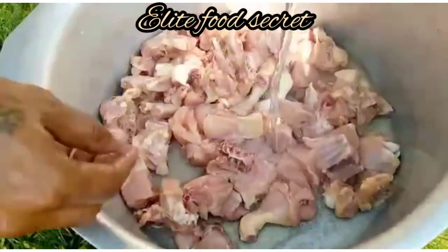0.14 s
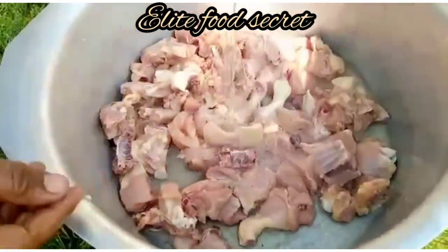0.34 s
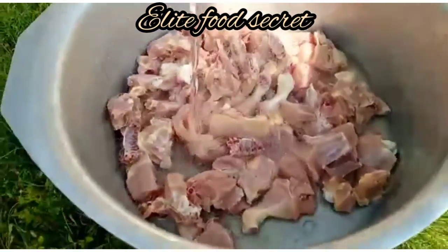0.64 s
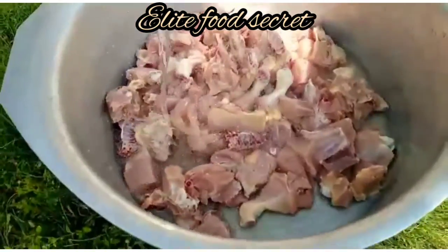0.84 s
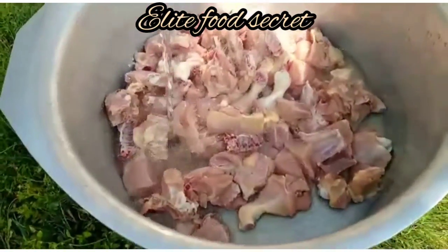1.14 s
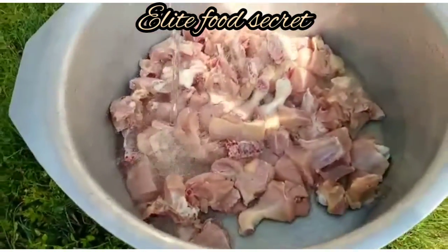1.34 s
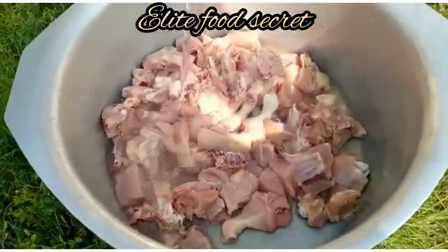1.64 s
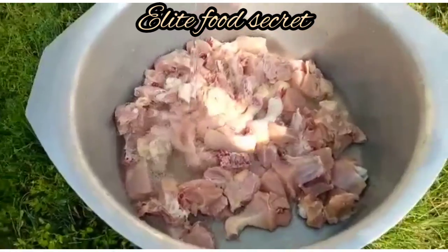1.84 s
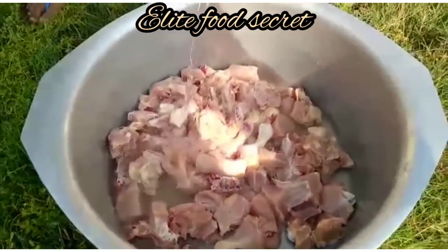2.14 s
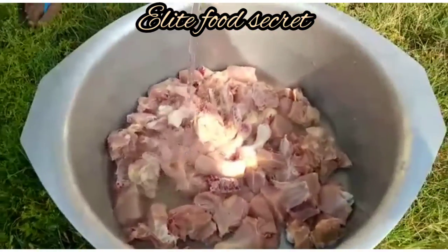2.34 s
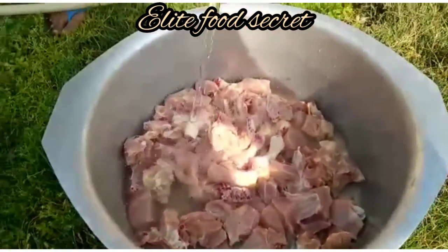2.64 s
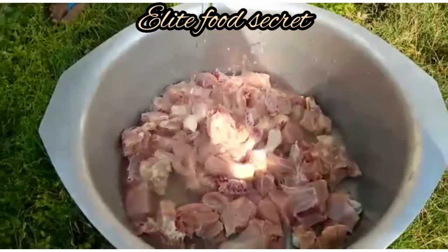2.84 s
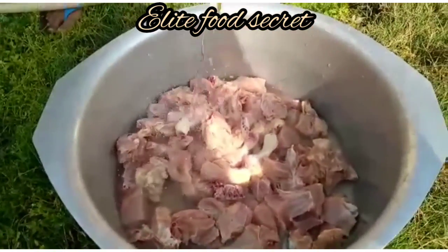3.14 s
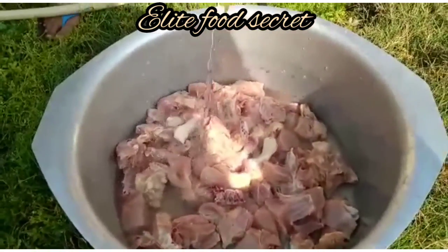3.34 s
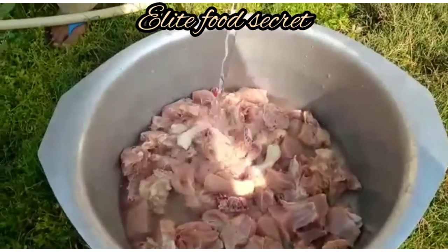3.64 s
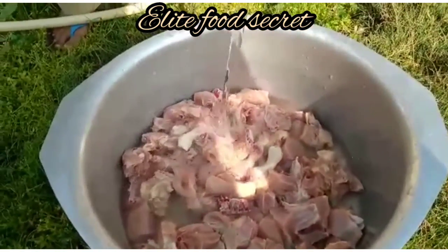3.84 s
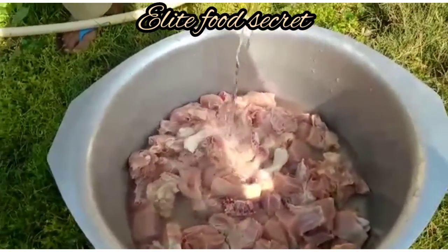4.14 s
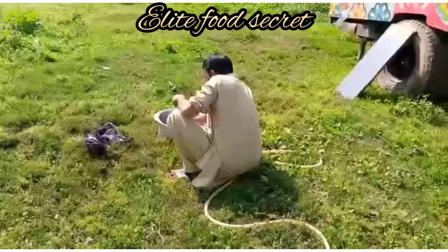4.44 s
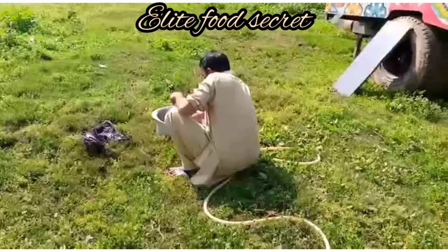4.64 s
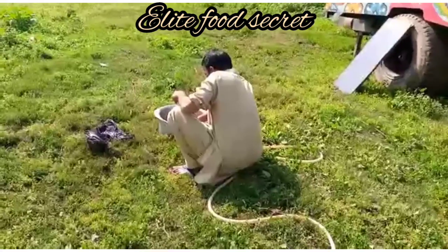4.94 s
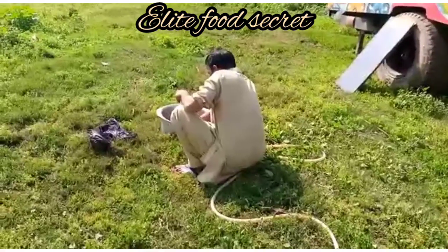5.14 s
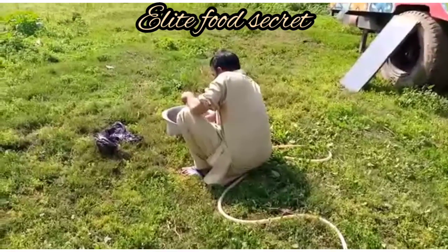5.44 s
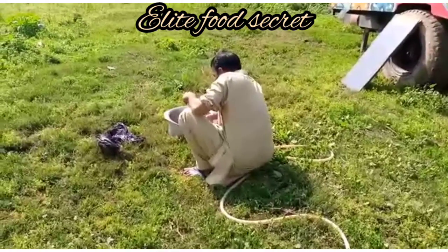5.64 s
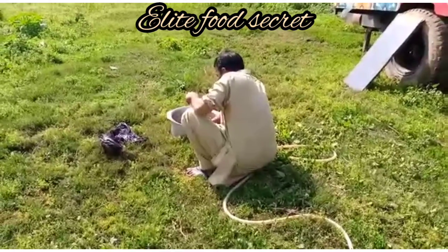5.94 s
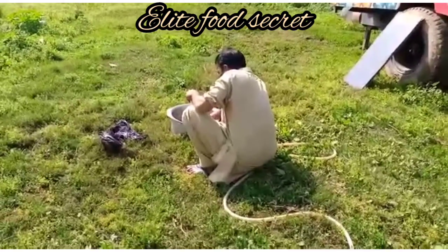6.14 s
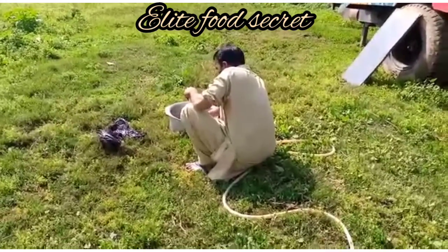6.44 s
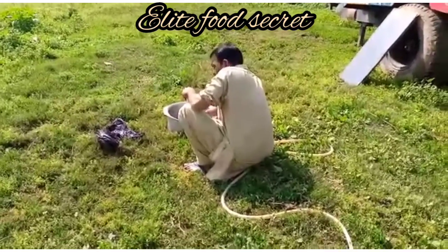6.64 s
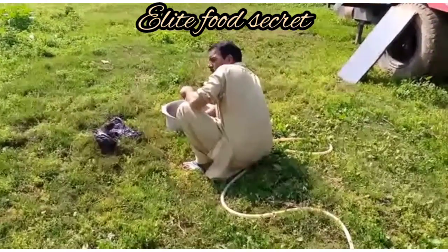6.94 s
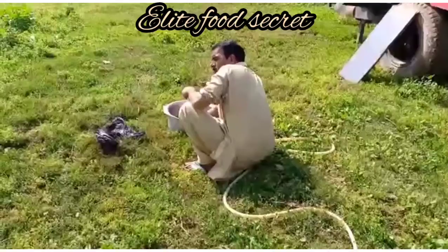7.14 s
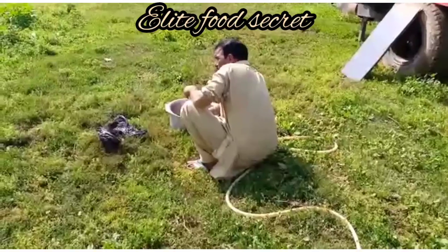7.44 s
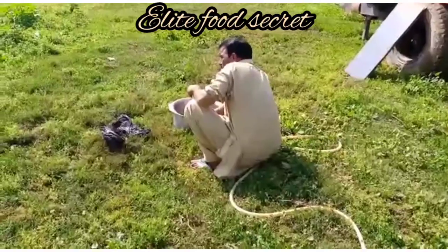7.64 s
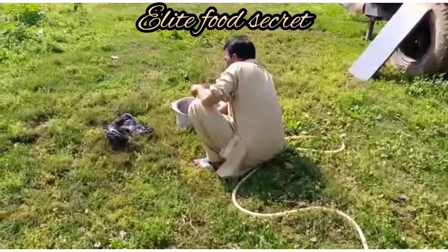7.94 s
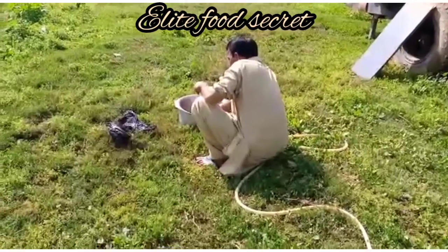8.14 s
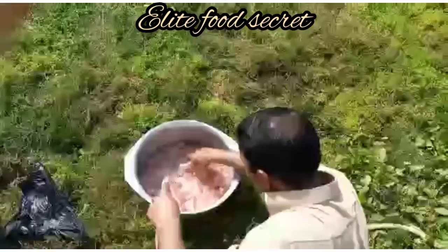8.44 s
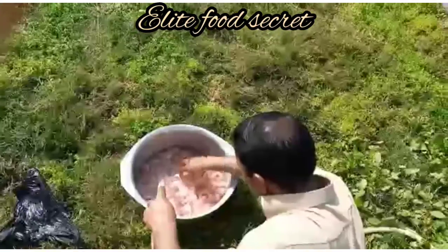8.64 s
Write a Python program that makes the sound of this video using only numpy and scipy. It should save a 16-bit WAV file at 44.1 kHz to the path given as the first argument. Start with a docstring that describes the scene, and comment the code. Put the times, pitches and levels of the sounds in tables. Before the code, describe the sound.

From 0 to 4.2 s, close up outdoors, a hose stream hits raw chicken in a wide metal pot: bright crackling spray and mid-pitched patter in uneven surges. The bare metal floor rings for the first half second, with bubbly glugs; sharp fat drops smack throughout. Gurgles recur, notably around 1.2 s and 3.8 s, and from about 3 s the splash shifts towards pooled water. A dull low rumble and soft bumps lie beneath. At 4.2 s the pour cuts off to far quieter distant washing: irregular sloshes, small wet smacks, drips and faint glugs, with a wavering low engine drone strongest around 4.5-6.8 s. Rising-then-falling bird whistles come near 4.6, 5.9 and 7.9 s, thin twitters around 5-5.6 and 7.3-7.8 s, and a faint grasshopper hiss swells intermittently. After a tiny silence at 8.3 s, closer squelchy, fizzing rubs follow in quick succession, with two nearer chirps at 8.5 and 8.7 s.

```python
"""Outdoors, a hose runs onto raw chicken in a wide metal pot: modal ringing of the bare floor comes first, with
filtered bubble showers for the spray on the meat and the gurgling pool, over an engine's harmonics and a rumble.
Then hands wash the pieces some way off, heard as coloured bubble showers rising with each stroke, while a
grasshopper rasps in swelling noise and birds whistle in gliding sines. After a brief silence come rubs close by,
and a nearer bird chirps."""
import sys
import numpy as np
from scipy import signal
from scipy.fft import rfft, irfft, next_fast_len
from scipy.io import wavfile
from scipy.ndimage import map_coordinates

SR = 44100
rng = np.random.default_rng(int(sys.argv[2]) if len(sys.argv) > 2 else 0)


def unload_audio(sound):
    """Save the sound as a 16-bit wav file, at the path given as the first command line argument."""
    columns = np.transpose(np.atleast_2d(sound))
    # keep every value between -1 and 1, then stretch to whole-number steps
    steps = np.round(np.clip(columns, -1, 1) * 32767)
    wavfile.write(sys.argv[1], SR, steps.astype(np.int16))


N = 388080
T = np.arange(N) / SR
POUR_END, FAR_END, NEAR_START = 4.228, 8.307, 8.356  # s


def amp(db):
    """Decibel law: a level in dB becomes an amplitude ratio."""
    return 10 ** (np.asarray(db) / 20)


def unit(x):
    """Power normalisation: scale to an rms of 1."""
    return x / np.sqrt(np.mean(x ** 2) + 1e-20)


def curves(rows, t=T):
    """Linear interpolation: one curve over time for each column after the time."""
    s, *columns = np.transpose(rows)
    return [np.interp(t, s, column) for column in columns]


def wobble(rate):
    """Slow random modulation: a smooth curve through `rate` random knots a second."""
    knots = rng.standard_normal(int(N * rate / SR) + 4)
    return map_coordinates(knots, [T * rate], order=2)


def add(track, s, sound):
    """Superposition: mix a sound in at time s."""
    part = track[max(round(s * SR), 0):][:len(sound)]
    part += sound[:len(part)]


def swells(rows, attack, release):
    """Envelopes added in power: each row rises, holds and decays; one gain curve per dB column."""
    power = np.zeros((len(rows[0]) - 2, N))
    for s, length, *db in rows:
        first, last = max(int(s * SR), 0), int((s + length + 8 * release) * SR)
        age = T[first:last] - s
        shape = np.clip(age / attack, 0, 1) * np.exp(-np.maximum(age - length, 0) / release)
        power[:, first:last] += (amp(db)[:, None] * shape) ** 2
    return np.sqrt(power)


def dips(rows, edge):
    """Soft-edged level changes: one dB curve per dip column."""
    total = 0
    for s, length, *db in rows:
        shape = np.clip(np.minimum(T - s, s + length + edge - T) / edge, 0, 1)
        total = total + np.outer(db, shape)
    return total


def coloured(x, points, band=(10, 20000), modes=(), size=8192):
    """Minimum-phase filtering: a spectrum lifted at its resonances and confined to a band; rms 1."""
    hz = np.fft.rfftfreq(size, 1 / SR) + 1
    f, level = np.transpose(points)
    level = np.interp(np.log(hz), np.log(f), level)
    for centre, width, lift in modes:
        level = level + lift / (1 + (2 * (hz - centre) / width) ** 2)
    gain = amp(level) / np.sqrt((1 + (band[0] / hz) ** 10) * (1 + (hz / band[1]) ** 10))
    # folding the cepstrum onto positive time makes the filter causal
    cepstrum = irfft(np.log(gain + 1e-6))
    cepstrum[1:size // 2] *= 2
    cepstrum[size // 2 + 1:] = 0
    impulse = irfft(np.exp(rfft(cepstrum)))
    return unit(signal.fftconvolve(x, impulse)[:N])


def bubble(t, hz, life, rise):
    """Bubble resonance: a briefly ringing sine whose pitch rises as the bubble nears the surface."""
    age = t / life
    ring = np.sin(2 * np.pi * hz * t * (1 + rise * age / 2))
    return ring * np.exp(-age) * (1 - np.exp(-10 * age))


def grains(rate, band, life, spread_db, blur):
    """Random superposition: `rate` uneven tiny bubbles a second over a noise blur of smaller ones; rms 1."""
    n = N // 2  # the shower repeats once, longer than any one action
    when, pitch, span, chance = rng.random((int(rate * n / SR), 4)).T[:, :, None]
    k = np.arange(min(int(5 * life * SR), 1500))
    lo, hi = band[0] / np.sqrt(2), min(band[1] * np.sqrt(2), SR / 2)
    size = amp(-spread_db * np.log(chance + .03))
    shots = size * bubble(k / SR, lo + (hi - lo) * pitch, life * (.5 + span / 2), rise=0.02)
    places = ((when * n).astype(int) + k).ravel() % n
    shower = np.resize(np.bincount(places, shots.ravel(), n), N)
    # white noise scaled so that its share within the band is `blur`
    noise = blur * np.sqrt(SR / 2 / (hi - lo)) * rng.standard_normal(N)
    return unit(unit(shower) + noise)


def patchy(x, depth_db, width_hz, length, size=512):
    """Clustering of like-sized bubbles: patches of random gain over time and pitch; rms 1."""
    overlap = 3 * size // 4
    z = signal.stft(x, nperseg=size, noverlap=overlap)[2]
    band, frame = np.indices(z.shape)
    where = [band * SR / size / width_hz, frame * size / 4 / SR / length]
    field = map_coordinates(rng.standard_normal((256, 512)), where, order=1, mode="mirror")
    patched = z * amp(depth_db * unit(field))
    return unit(signal.istft(patched, nperseg=size, noverlap=overlap)[1][:N])


def pops(rows, life, rise, wet):
    """Single bubble resonances, each roughened by a wet rasp and softened by the water around its pitch."""
    out, t = np.zeros(N), np.arange(SR // 8) / SR
    for s, db, hz in rows:
        rasp = unit(signal.lfilter(*signal.butter(2, hz / 6, fs=SR), rng.standard_normal(len(t))))
        soften = signal.butter(2, [hz * 2 / 3, hz * 3 / 2], "bandpass", fs=SR)
        pop = signal.lfilter(*soften, bubble(t, hz, life, rise) * (1 + wet * rasp))
        add(out, s, amp(db) * pop / np.abs(pop).max())
    return out


# the jet drums on the bare floor: start_s, length_s, level_db
DRUMMING = [(-.12, 0.557, -48)]
# damped modes of the floor: pitch_hz, t60_s, level_db (relative, at equal decay time)
POT_FLOOR = [(312, .2, -12.5), (600, 0.25, -11), (636, 0.37, -3), (686, 0.17, -9), (1161, 0.31, 4),
             (1225, 0.2, 0), (1880, .085, -17), (2340, 0.17, 4.5), (2460, 0.11, 4), (3460, 0.11, 8)]


def drumming():
    """Modal synthesis: drops striking the thin metal floor keep its damped modes ringing."""
    t = np.arange(SR // 8) / SR
    ring = 0
    for hz, t60, db in POT_FLOOR:
        ring = ring + amp(db - 60 * t / t60) / np.sqrt(t60) * np.sin(2 * np.pi * hz * t)
    blows = (rng.random(N) < 400 / SR) * rng.standard_normal(N)  # 400 a second
    gain = swells(DRUMMING, attack=0.43, release=.01)[0]
    return gain * unit(signal.fftconvolve(blows, ring)[:N])


# surges of the hose, levels before each layer's trim: start_s, length_s, spray_level_db, patter_level_db
SURGES = [(0.022, 0.1, -37, -42.0), (0.179, 0.057, -42, -46), (0.268, 0.15, -40.0, -41),
          (0.527, 0.03, -35.5, -42.5), (0.638, 0.11, -53, -47.5), (0.86, 0.11, -38, -41),
          (1.101, 0.093, -42.5, -40), (1.226, 0.12, -42, -41), (1.328, 0.11, -40.5, -46),
          (1.474, 0.18, -44, -46), (1.679, 0.071, -41, -47.5), (1.831, 0.094, -40.5, -43.5),
          (2.061, 0.18, -38.5, -41), (2.329, 0.089, -38, -45.0), (2.477, 0.11, -46, -45.5),
          (2.629, 0.23, -42.0, -46), (2.946, 0.098, -44.5, -67), (3.33, 0.25, -40.5, -49),
          (3.566, 0.07, -48, -48), (3.692, 0.04, -49, -40.5), (3.761, 0.13, -42.5, -44.5),
          (3.957, 0.072, -61, -47.5), (4.085, 0.11, -43.5, -50)]
# the stream thins: start_s, length_s, spray_change_db, patter_change_db
LULLS = [(.14, 0.036, -4, -2), (.22, 0.06, -3.5, -3.5), (.45, 0.046, -1, -9), (1.78, 0.044, -0.5, -5),
         (1.97, 0.078, -4.5, 2.5), (2.56, 0.077, -4, 1), (2.9, 0.13, -2, -3.5), (3.14, 0.2, -2, -6)]


def stream_gains():
    """Unsteady flow: surges add in power to an even stream; gains of spray and patter."""
    even_db = [[-42], [-50]]  # spray, patter
    surge = swells(SURGES, attack=0.011, release=0.024)
    return np.hypot(surge, amp(even_db)) * amp(dips(LULLS, edge=0.018))


# where the jet lands: time_s, pool_share (0 = on the heap, 1 = in the pool by the wall)
AIM = [(0, 0.017), (2.92, 0.016), (2.98, 0.37), (3.35, 0.97), (4.2, 0.95)]
# splash spectra on the meat and in the pool: pitch_hz, level_db (per Hz, relative)
ON_HEAP = [(300, -35), (500, -30), (800, -29.5), (1200, -15), (2000, -8.5), (3000, -5), (3550, -3.5),
           (4100, -9.5), (4700, -14.5), (5600, -8), (6700, 2), (8000, -4.5), (10500, -22), (13500, -21),
           (15000, -7.5)]
IN_POOL = [(300, -45.5), (500, -31.5), (800, -22), (1300, -13.5), (2000, -9.5), (3300, -12.5), (4400, -3.5),
           (5400, -2), (6500, -3), (7600, -15), (9500, -10.5), (12000, -25.5), (13500, -29), (15000, -5.5)]
# air resonances of the pot: pitch_hz, width_hz, lift_db
POT_AIR = [(644, 40, 8), (1148, 27, 7.5), (1281, 38, 5.5), (1569, 34, 8), (1700, 20, 3), (1920, 48, 10.5),
           (2316, 36, 8), (2740, 30, 8.5), (3252, 45, 7), (3520, 250, 2.5)]


def splash(clumps, band, patchy_db, **shower):
    """Power crossfade: a clumped bubble shower moves from the meat's spectrum to the pool's."""
    pool = np.clip(curves(AIM)[0], 0, 1)
    x = patchy(grains(band=band, **shower), patchy_db, width_hz=377, length=.03)
    x = x * amp(clumps + 0.39 * wobble(70))
    heap_sound = coloured(x, ON_HEAP, band, POT_AIR)
    pool_sound = coloured(np.roll(x, SR), IN_POOL, band, POT_AIR)  # shifted 1 s, so the two do not match
    return np.sqrt(1 - pool) * heap_sound + np.sqrt(pool) * pool_sound


def spray(gain, clumps):
    """Droplet breakup: a dense high crackle with a sparser, longer-ringing tinkle."""
    crackle = splash(clumps, (4200, 16000), patchy_db=2.0, rate=5000, life=0.00086, spread_db=5.0, blur=0.62)
    tinkle = splash(clumps, (3000, 9000), patchy_db=1.0, rate=260, life=0.0032, spread_db=2.5, blur=.05)
    return gain * (amp(-0.25) * crackle + amp(-8) * tinkle)


# gain of the bigger, lower bubbles within the patter: time_s, level_db
BIG_BUBBLES = [(.45, -3), (.53, 3), (1.1, 5), (1.4, 0.5), (2.2, 1.5), (2.4, -3), (2.9, -5.5), (3.05, 0.5),
               (4.2, 1)]


def patter(gain, clumps):
    """Size governs pitch: a mid-band shower whose low part, the bigger bubbles, has its own level."""
    x = splash(clumps, (580, 4200), patchy_db=2.0, rate=1300, life=.0034, spread_db=4, blur=0.63)
    x = amp(-0.88) * gain * x
    lowpass = signal.butter(3, 1750, fs=SR, output="sos")  # Hz
    big = signal.sosfiltfilt(lowpass, x)
    return x - big + amp(curves(BIG_BUBBLES)[0]) * big


# the jet folds air into the pool, before a trim: start_s, length_s, level_db
GURGLES = [(.25, 0.082, -64), (.545, .13, -74), (.902, 0.22, -73), (1.106, .39, -57.5),
           (1.532, 0.27, -74.5), (1.834, .24, -68.5), (2.101, 0.085, -65), (2.24, 0.13, -69),
           (2.716, 0.15, -75.5), (3.022, 0.074, -71), (3.247, .37, -75.5), (3.573, .16, -69),
           (3.753, .18, -54.5), (3.984, 0.16, -64), (4.122, 0.047, -54)]


def gurgle(clumps):
    """Air entrainment: low bubbles ring whenever the jet folds air into the pool."""
    rest_db = -84
    gain = np.hypot(swells(GURGLES, attack=0.04, release=0.031)[0], amp(rest_db))
    x = splash(clumps, (280, 720), patchy_db=3, rate=200, life=0.015, spread_db=2.0, blur=0.55)
    return amp(-0.04) * gain * x


# deep glugs where the jet digs into the pool, before a trim: start_s, level_db (peak), pitch_hz
GLUGS = [(.267, -33, 620), (.284, -33, 800), (.327, -40, 620), (1.159, -42, 884), (1.281, -40, 485),
         (1.359, -41, 630), (3.781, -40, 670), (3.822, -41, 665), (3.933, -43, 644), (4.162, -43, 706)]


def glugs():
    """Cavity resonance: large single bubbles ring low."""
    return amp(-9) * pops(GLUGS, life=0.0078, rise=0.034, wet=0.51)


def jet():
    """Jet breakup: one random clumping shapes spray, patter and gurgle together."""
    clumps = 1.5 * wobble(45) + 2.07 * wobble(220)  # dB
    spray_gain, patter_gain = stream_gains()
    return spray(spray_gain, clumps) + patter(patter_gain, clumps) + gurgle(clumps) + glugs()


# strength of the far engine's drone: time_s, level_db (of the second harmonic, before a trim)
DRONE = [(0, -63.5), (2.2, -70), (4.1, -74.5), (4.55, -57), (4.95, -61.5), (5.3, -54), (6.35, -58),
         (6.75, -62), (6.95, -80), (7.15, -66.5), (8.03, -68), (8.18, -57.5), (8.32, -65.5), (8.8, -65.5)]
# the octave overtone above it fades: start_s, length_s, change_db
OCTAVE_FADES = [(4.5, 0.21, -7), (4.95, 0.76, -6), (6.0, 0.44, -6), (6.87, 0.27, -15), (8.3, .5, -8)]


def engine():
    """Harmonic series: four low engine orders waver on their way through the air."""
    fundamental_hz = 49.3  # mean
    octave_pot_db, octave_open_db = -73, -67  # by the pot, in the open
    drone_db = curves(DRONE)[0] + 1.1 * wobble(6)
    octave_db = np.where(T < POUR_END, octave_pot_db, octave_open_db)
    octave_db = octave_db + dips(OCTAVE_FADES, edge=.08)[0] + 2.0 * wobble(4.1)
    turn = 2 * np.pi * np.cumsum(fundamental_hz * (1 + 0.0039 * wobble(4.6))) / SR
    first_db = drone_db - 26.5 + 3 * wobble(3.04)
    third_db = drone_db - 18.5 + 3 * wobble(3.4)
    drone = 0
    for k, db in enumerate([first_db, drone_db + 0.5, third_db, octave_db], 1):
        drone = drone + amp(db) * np.sqrt(2) * np.sin(k * turn + .2 * wobble(2.7))
    return drone


# spectrum of the outdoor rumble: pitch_hz, level_db (per Hz, relative)
RUMBLE = [(20, -31), (35, -15), (50, -4.5), (78, 1.5), (105, -0.5), (135, -5), (170, -7.5), (215, -14),
          (265, -22), (400, -37), (700, -54)]
# the rumble swells briefly: start_s, length_s, level_db
RUMBLE_SWELLS = [(1.25, 0.354, -55), (2.55, 0.26, -64.5)]


def rumble():
    """Low-frequency noise: a dull outdoor rumble slowly eases, with two brief swells."""
    steady = amp(-60.5 - .5 * T)  # falls half a dB a second
    gain = np.hypot(steady, swells(RUMBLE_SWELLS, attack=0.038, release=.03)[0])
    return gain * coloured(rng.standard_normal(N), RUMBLE)


# fat drops smacking on the meat, before a trim: start_s, level_db (peak), pitch_hz
DROPS = [(.0343, -20, 6760), (.198, -25, 2490), (.2808, -21, 6740), (.326, -20, 3510), (.3805, -21, 3540),
         (.3974, -23, 3560), (.4329, -21, 3330), (.4665, -21.5, 7410), (.5562, -17, 3910),
         (.5615, -19.5, 3550), (.6983, -20, 6920), (.7173, -24, 3460), (.8121, -23, 6680),
         (.9946, -20, 7550), (1.273, -17.5, 7150), (1.4225, -21.5, 6330), (1.555, -14.5, 6500),
         (1.8035, -18, 6320), (1.8395, -16.5, 6520), (1.9026, -20, 3510), (2.0053, -24, 3550),
         (2.2034, -19, 7050), (2.6652, -17, 6840), (2.802, -21, 6980), (2.9542, -24, 7220),
         (3.4087, -22, 5690), (3.7788, -19, 5430), (4.0602, -15, 5150), (4.1448, -18, 4750),
         (4.1729, -22, 6660), (4.2088, -25, 4800)]


def drops():
    """Impact transients: very short rings with a strong wet rasp."""
    return amp(-2.5) * pops(DROPS, life=.0017, rise=.01, wet=.8)


# air pockets closing in the water, before a trim: start_s, level_db (peak), pitch_hz
PLOPS = [(.2276, -31, 1500), (.2825, -30.5, 1160), (.408, -32.5, 1157), (3.6254, -32, 1265),
         (4.5156, -42, 1870), (5.276, -42, 1680), (6.2307, -43, 1820), (6.7275, -45, 1230),
         (7.0595, -46, 1700), (7.4061, -43, 1810), (8.171, -49, 1220), (8.2418, -39, 1710)]


def plops():
    """Cavity closure: each air pocket rings with a slight upward glide."""
    return amp(-7.5) * pops(PLOPS, life=0.0074, rise=0.018, wet=0.25)


# soft low bumps, before a trim: start_s, level_db (peak), pitch_hz
BUMPS = [(1.305, -41, 168), (1.451, -37, 103), (1.571, -41, 98), (2.568, -41.5, 115), (2.718, -39, 66),
         (2.735, -45, 147)]


def bumps():
    """Damped resonance: dull thuds of constant pitch."""
    return amp(-2.5) * pops(BUMPS, life=0.0032, rise=0, wet=0.59)


# swelling bouts of a grasshopper: start_s, length_s, level_db
BOUTS = [(4.1, 0.32, -73.5), (6.05, 0.55, -73.5), (8.05, 0.69, -78)]
# spectrum of its rasp: pitch_hz, level_db (per Hz, relative)
RASP = [(7000, 4), (8400, -3), (9200, -3), (9900, -6), (10700, -23), (11600, -4), (12500, -14), (14000, -9),
        (15200, 1)]


def grasshopper():
    """Stridulation: fast leg strokes blur into a thin hiss that swells about every two seconds."""
    strokes = coloured(rng.standard_normal(N), RASP, (7000, 16000)) * amp(1.7 * wobble(90))
    return (T >= POUR_END) * swells(BOUTS, attack=0.23, release=0.11)[0] * strokes


# strokes of the hands some way off, before trims: start_s, length_s, slosh_level_db, fizz_level_db
STROKES = [(4.337, 0.24, -63, -69.5), (4.635, 0.13, -62, -76), (4.997, 0.14, -60.5, -72),
           (5.249, 0.13, -62.5, -83), (5.485, 0.18, -65, -86.5), (5.72, 0.02, -65.5, -69),
           (5.977, 0.097, -72, -76), (6.126, 0.14, -61.5, -70), (6.277, 0.31, -67.5, -69),
           (6.699, 0.11, -62.5, -69), (6.88, 0.026, -60.5, -73), (7.042, 0.17, -64, -75),
           (7.205, 0.032, -59, -72), (7.318, 0.19, -62.5, -70.5), (7.531, 0.16, -64.5, -72.5),
           (8.023, 0.095, -85, -83), (8.163, 0.12, -83, -68.5)]
# pieces pushed under water, before a trim: start_s, length_s, glug_level_db
DUNKS = [(4.335, 0.07, -81), (4.456, 0.13, -73.5), (4.624, 0.09, -77), (4.736, 0.32, -75.0),
         (5.208, 0.12, -77), (5.37, 0.2, -75.5), (5.635, 0.35, -76), (6.356, 0.2, -78), (6.891, 0.03, -76),
         (7.048, 0.045, -69.5), (7.475, 0.14, -80), (8.049, 0.04, -83.5)]
# spectrum of the far washing: pitch_hz, level_db (per Hz, relative)
FAR_COLOUR = [(300, -25.5), (600, -27.5), (790, -16.5), (950, -14), (1200, -7.5), (1500, -7), (1800, -1.5),
              (2300, -9.5), (4000, -9.5), (5000, -7), (5700, -17), (8300, -18), (10500, -39), (14000, -36),
              (15300, -22)]
# spectrum of the hiss of grass: pitch_hz, level_db (per Hz, relative)
MEADOW = [(250, -15.5), (450, -1.5), (650, -9), (1200, -8), (2000, 7.5), (4500, -8.5), (6000, -0.5),
          (8300, -6.5), (10500, -59), (14000, -22), (15300, -9)]


def far_wash():
    """Agitated bubbly water: hands stir the pieces some way off, in a faint hiss of grass."""
    rest_db = [[-64], [-81.5], [-93.5]]  # water between strokes: slosh, fizz, glug
    strokes = swells(STROKES, attack=0.019, release=0.037)
    dunks = swells(DUNKS, attack=.02, release=0.048)
    slosh_gain, fizz_gain, glug_gain = np.hypot(np.vstack([strokes, dunks]), amp(rest_db))
    slosh = grains(700, (1000, 5400), life=0.0046, spread_db=2.5, blur=1.36)
    slosh = patchy(slosh, depth_db=3.0, width_hz=291.6, length=.045)
    fizz = grains(2500, (5400, 16000), life=.0006, spread_db=5.5, blur=1.1) * amp(2.4 * wobble(30))
    glug = grains(110, (400, 1000), life=0.036, spread_db=1.5, blur=0.8)
    glug = patchy(glug, depth_db=2, width_hz=122, length=0.073)
    return (amp(-1.8) * slosh_gain * coloured(slosh, FAR_COLOUR, (1050, 5400))
            + amp(0.7) * fizz_gain * coloured(fizz, FAR_COLOUR, (5400, 16000))
            + amp(1.9) * glug_gain * coloured(glug, FAR_COLOUR, (300, 1000))
            + amp(-72.5) * coloured(rng.standard_normal(N), MEADOW, (250, 16000)))


def drips(count):
    """Random arrivals: stray drips off the hands fall back into the pot."""
    lowest_hz, highest_hz = 1092, 3750
    when, pitch, size = rng.random((count, 3)).T
    s = POUR_END + when * (FAR_END - POUR_END)
    hz = lowest_hz * (highest_hz / lowest_hz) ** pitch
    db = -56 + 1.5 * (2 * size - 1)
    return pops(zip(s, db, hz), life=0.0046, rise=0.016, wet=0.55)


# wet smacks of the hand, before a trim: start_s, level_db (peak), pitch_hz
SMACKS = [(4.517, -45.5, 3100), (5.0305, -46, 4700), (5.2974, -50, 4800), (5.7494, -50, 4970),
          (6.003, -44, 4660), (6.1484, -40.5, 3820), (6.2, -47, 3600), (6.2316, -44.5, 3800),
          (6.4202, -46.5, 4640), (6.7565, -44, 4540), (6.8016, -45, 4700), (7.1576, -46.5, 4320),
          (7.229, -37, 4660), (7.4936, -45, 5130), (7.5515, -47, 3900), (8.048, -40, 4760),
          (8.2426, -48, 5150), (8.4577, -40, 6630)]


def smacks():
    """Impact transients: short rings heavily roughened by a wet rasp."""
    return amp(-2.0) * pops(SMACKS, life=0.0036, rise=0.0093, wet=1.0)


def note(rows, ratio, waver, rate):
    """Frequency modulation: a gliding sine whose pitch trembles through `rate` random knots a second."""
    t = np.arange(int(rows[-1][0] * SR)) / SR
    hz, db = curves(rows, t)
    tremble = map_coordinates(rng.standard_normal(256), [t * rate], order=1, mode="mirror")
    phase = 2 * np.pi * np.cumsum(hz * ratio * (1 + waver * tremble)) / SR
    return (t >= rows[0][0]) * amp(db) * np.sin(phase)


# one bird's calls, before trims: start_s, level_db, pitch_ratio
CALLS = [(4.564, -58, 1.01), (5.938, -57, 0.96), (7.935, -56.5, 1)]
# its rising whistle, at ratio 1: time_s (from the call's start), pitch_hz, level_db (relative)
WHISTLE = [(0, 3550, -20), (.03, 3850, -9), (.08, 4200, -7), (.096, 4650, -6), (.104, 5200, -3),
           (.135, 5200, 0), (.16, 5270, -4), (.2, 5270, -5), (.23, 5200, -25)]
# its falling after-note, at ratio 1: time_s (from the call's start), pitch_hz, level_db (relative)
AFTER_NOTE = [(.24, 7360, -28), (.27, 6500, -2.5), (.3, 5600, -8), (.35, 5060, -2)]


def whistles():
    """Gliding tones: each call is a rising whistle and a rougher falling after-note."""
    song = np.zeros(N)
    for s, db, ratio in CALLS:
        add(song, s, amp(db - 1.5) * note(WHISTLE, ratio, waver=0.0173, rate=260))
        add(song, s, amp(db - 5.5) * note(AFTER_NOTE, ratio, waver=0.063, rate=1200))
    return song


# thin high twitters, before a pitch ratio: start_s, length_s, start_pitch_hz, end_pitch_hz, level_db
TWITTERS = [(4.975, 0.058, 11300, 11800, -89), (5.052, .13, 9700, 10100, -82),
            (5.18, 0.14, 10000, 9750, -83), (5.337, 0.087, 12250, 11800, -79),
            (5.41, .12, 10200, 9600, -82), (5.57, 0.034, 9900, 9600, -81), (7.282, 0.19, 11900, 11000, -83),
            (7.384, 0.2, 9700, 10200, -82), (7.506, 0.2, 11700, 11350, -81), (7.603, .26, 10000, 9500, -81),
            (7.762, 0.11, 12400, 11200, -90), (7.78, 0.097, 9050, 8200, -80)]


def twitters():
    """Gliding tones: thin high notes with an arched level."""
    song = np.zeros(N)
    for s, length, start_hz, end_hz, db in TWITTERS:
        middle_hz = (start_hz + end_hz) / 2 + 100
        arch = [(0, start_hz, -12), (length / 2, middle_hz, 0), (length, end_hz, -10)]
        add(song, s, amp(db) * note(arch, 0.98, waver=0.013, rate=96))
    return song


def scattered(song):
    """Diffuse reverberation: trees return the song as a decaying noise tail."""
    t = np.arange(SR // 2) / SR
    tail = rng.standard_normal(len(t)) * amp(-60 * t / .15)  # 60 dB down in 0.15 s
    return song + amp(-1) * signal.fftconvolve(song, tail / np.linalg.norm(tail))[:N]


# rubs close by: start_s, length_s, slosh_level_db, fizz_level_db, glug_level_db
RUBS = [(8.406, 0.085, -63, -60.5, -68.5), (8.487, 0.13, -59.5, -62, -84.5), (8.62, 0.085, -60.5, -62, -67),
        (8.69, 0.1, -57, -62.0, -77.5)]
# spectrum of the near washing: pitch_hz, level_db (per Hz, relative)
NEAR_COLOUR = [(250, -20), (340, -12), (600, -26), (730, -19), (900, -24), (1200, -8), (1750, -1.5),
               (2600, -9.5), (5200, -15.5), (6600, -2.5), (7700, -9), (8800, -29.5), (14000, -23),
               (15300, -18)]


def near_wash():
    """Agitated bubbly water: close by, each rub squelches and fizzes."""
    rest_db = [[-62], [-69.5], [-74]]  # water between rubs: slosh, fizz, glug
    rubs = swells(RUBS, attack=0.017, release=0.026)
    slosh_gain, fizz_gain, glug_gain = np.hypot(rubs, amp(rest_db))
    slosh = grains(950, (1000, 5000), life=0.0057, spread_db=4.5, blur=1.0)
    fizz = grains(1500, (5000, 16000), life=0.00091, spread_db=4, blur=0.45)
    glug = grains(260, (280, 1000), life=0.0077, spread_db=3.5, blur=0.26)
    return (slosh_gain * coloured(slosh, NEAR_COLOUR, (1050, 5000))
            + fizz_gain * coloured(fizz, NEAR_COLOUR, (5000, 16000))
            + glug_gain * coloured(glug, NEAR_COLOUR, (280, 950)))


# a nearer bird's slurred chirps, one list each: time_s, pitch_hz, level_db
CHIRPS = [
    [(8.505, 4100, -60), (8.515, 3300, -57), (8.526, 2400, -50), (8.538, 1900, -74)],
    [(8.668, 2600, -72), (8.68, 3400, -66), (8.7, 3700, -62), (8.722, 3750, -55), (8.738, 3400, -54),
     (8.748, 2300, -53), (8.757, 1900, -66)],
]


def chirps():
    """Gliding tones: quick slurs from a nearer bird, without the trees' tail."""
    song = np.zeros(N)
    for chirp in CHIRPS:
        add(song, 0, note(chirp, 1.0, waver=0.0082, rate=360))
    return song


def scene():
    """Superposition: pouring, far washing and near washing in turn, with the outdoors around them."""
    water = (jet() + drumming()) * (T < POUR_END)
    water += far_wash() * (T >= POUR_END) * (T < FAR_END)
    water += near_wash() * (T >= NEAR_START)
    water += drops() + plops() + smacks() + drips(count=24)
    birds = scattered(whistles() + twitters()) + chirps()
    mono = water + bumps() + engine() + rumble() + birds + grasshopper()
    return np.array([mono, mono])


def record(dry):
    """Band limiting: a moment of silence before the close washing, and nothing above the top frequency."""
    top_hz = 15850
    gated = dry * ((T < FAR_END) | (T >= NEAR_START))
    m = next_fast_len(N + SR // 2)
    passband = np.fft.rfftfreq(m, 1 / SR) < top_hz
    return irfft(rfft(gated, m) * passband, m)[:, :N]


dry = scene()
out = record(dry)
unload_audio(out)
```